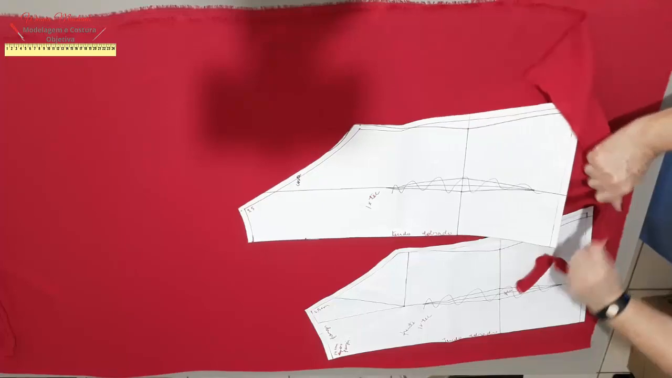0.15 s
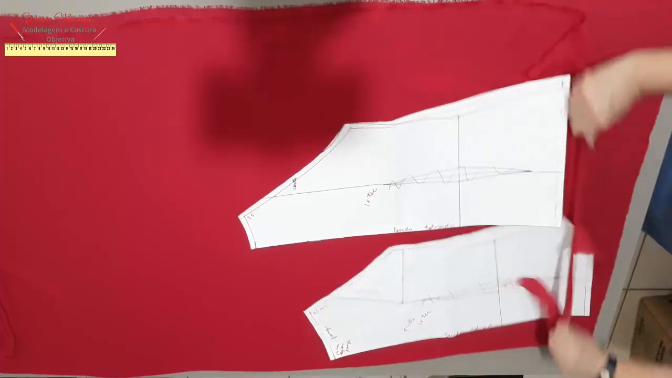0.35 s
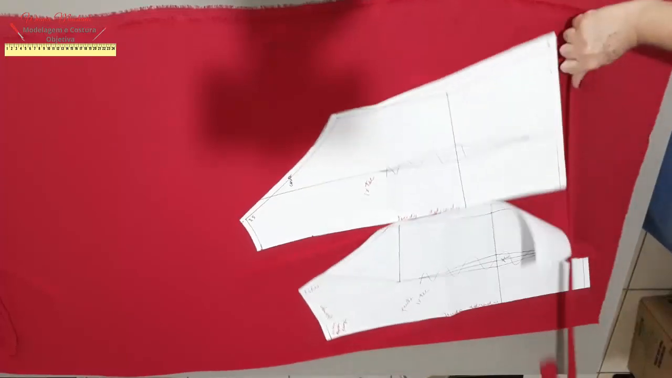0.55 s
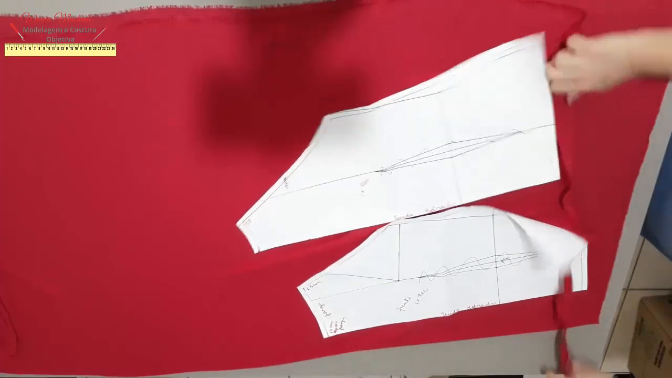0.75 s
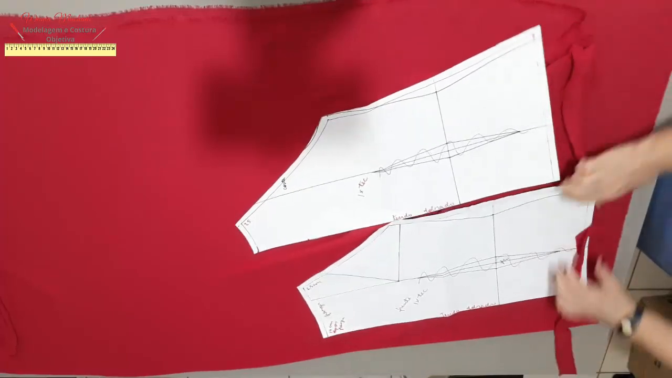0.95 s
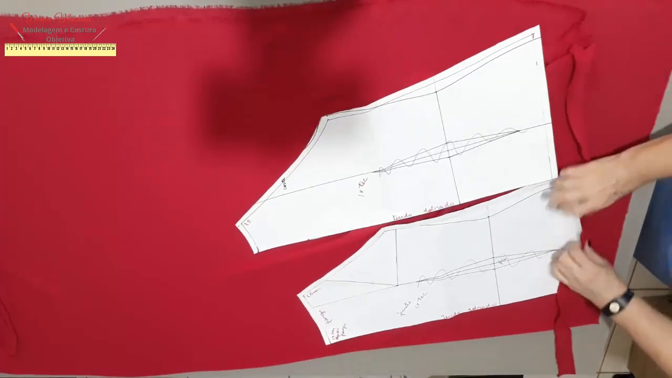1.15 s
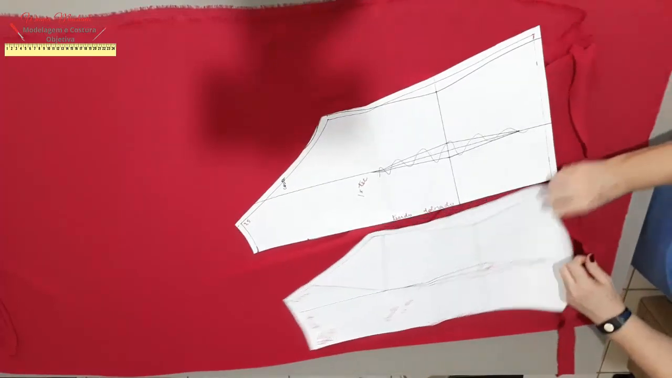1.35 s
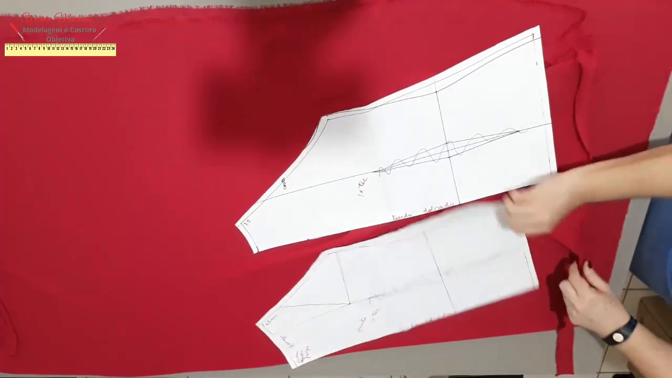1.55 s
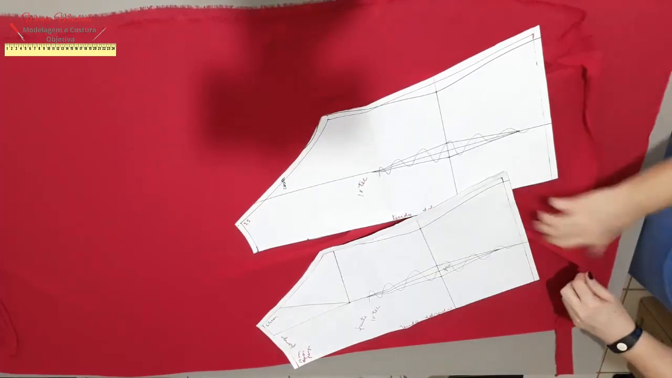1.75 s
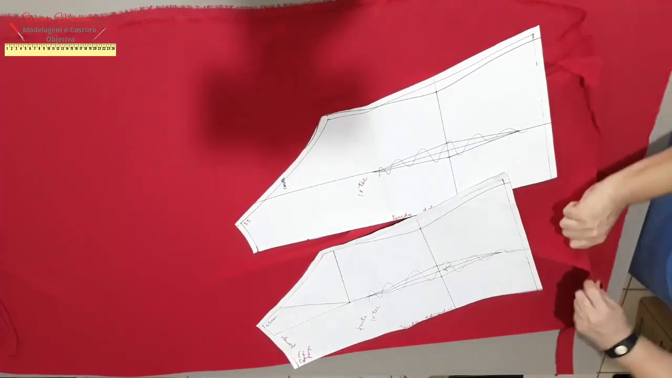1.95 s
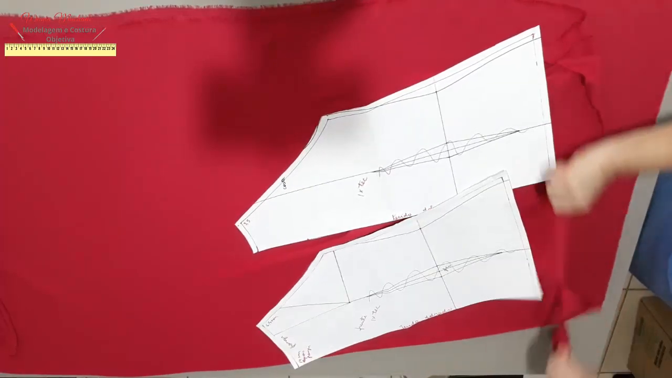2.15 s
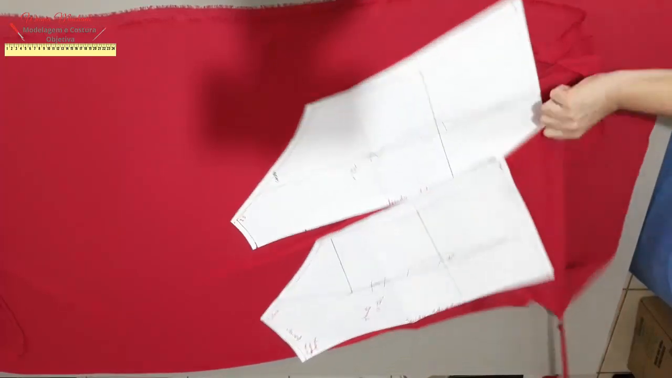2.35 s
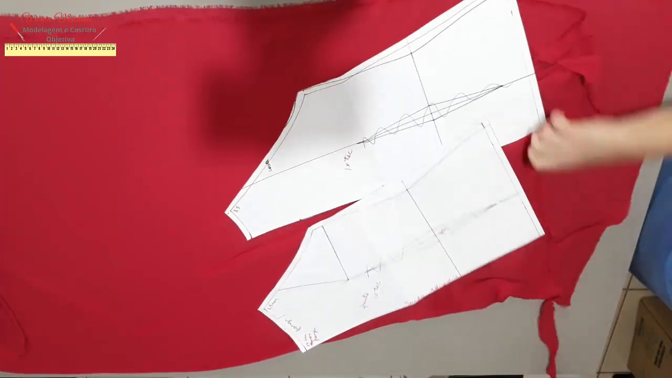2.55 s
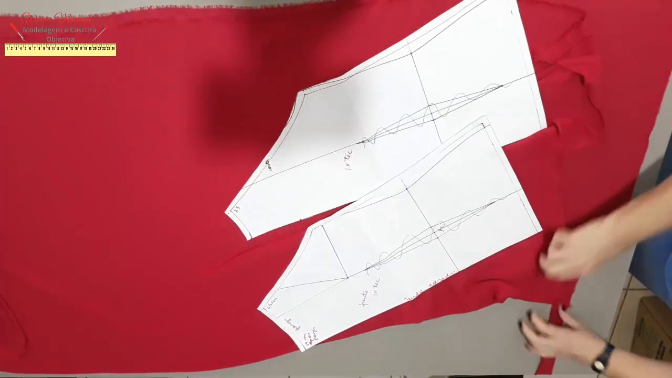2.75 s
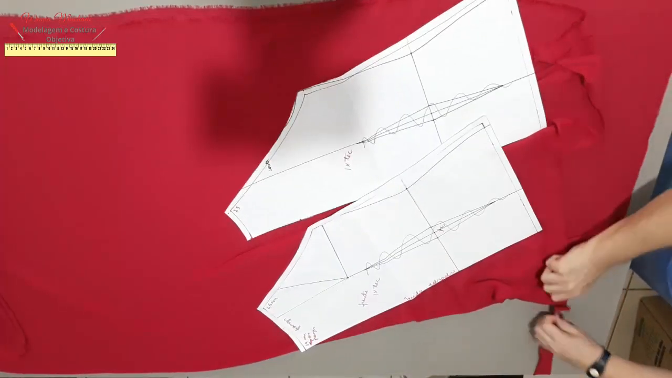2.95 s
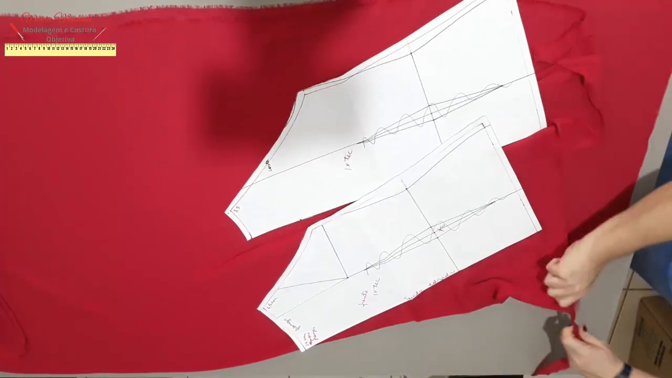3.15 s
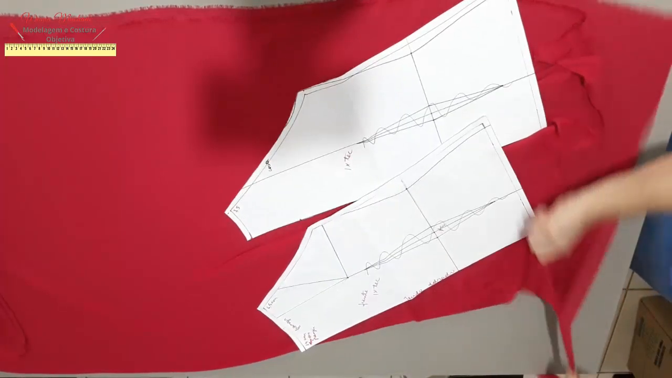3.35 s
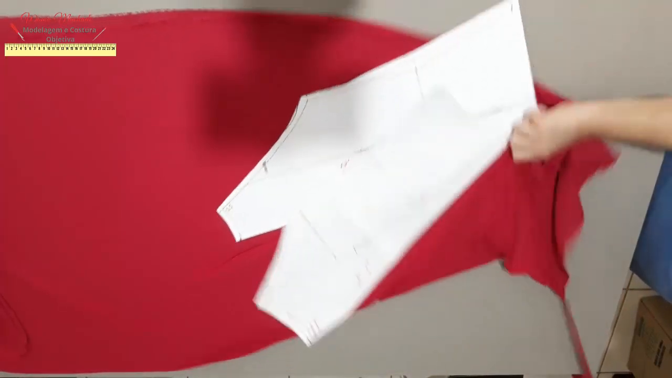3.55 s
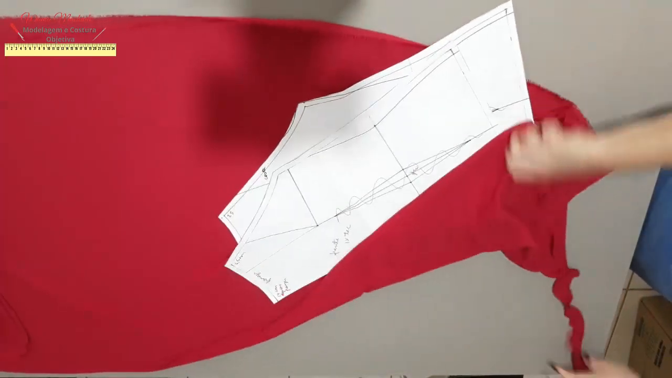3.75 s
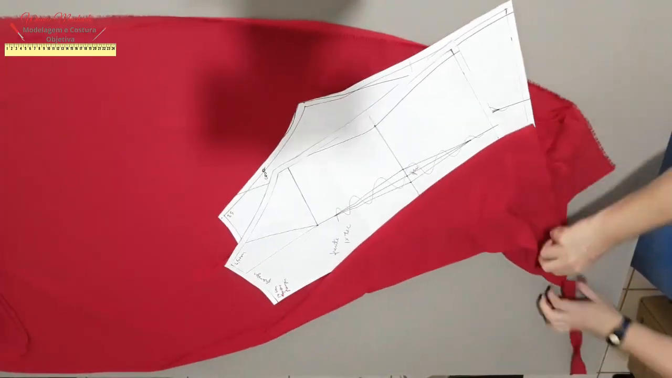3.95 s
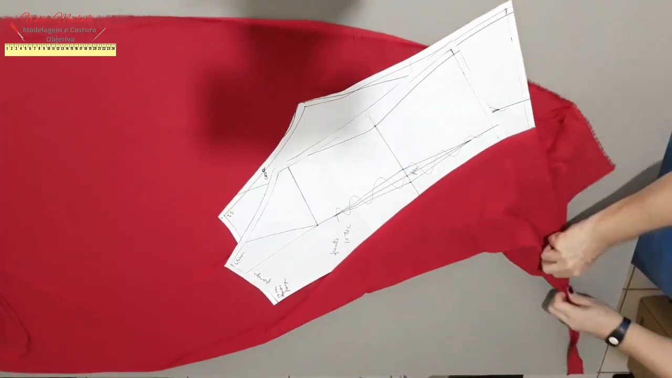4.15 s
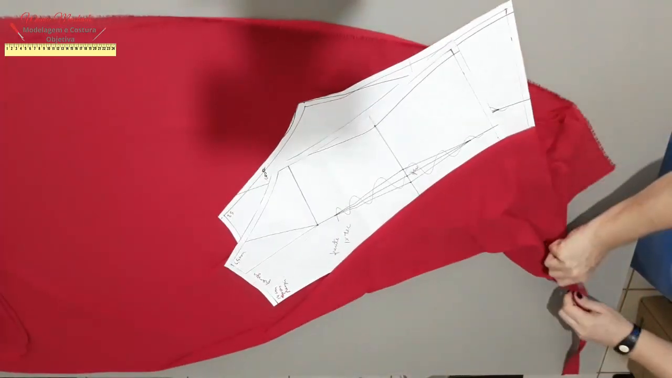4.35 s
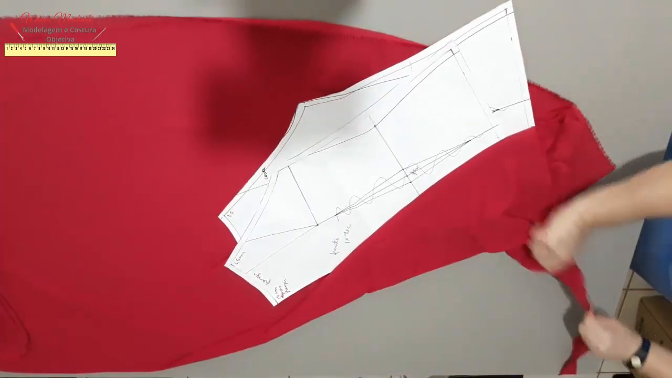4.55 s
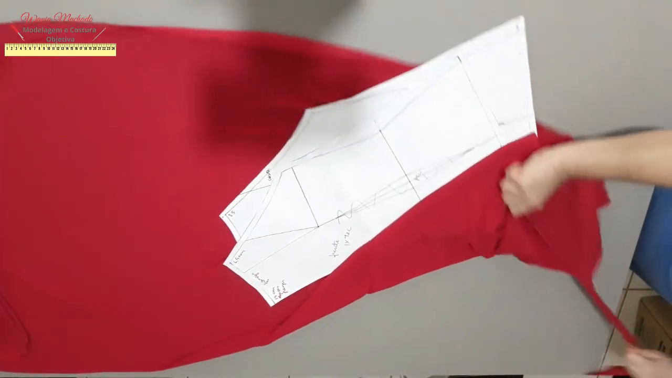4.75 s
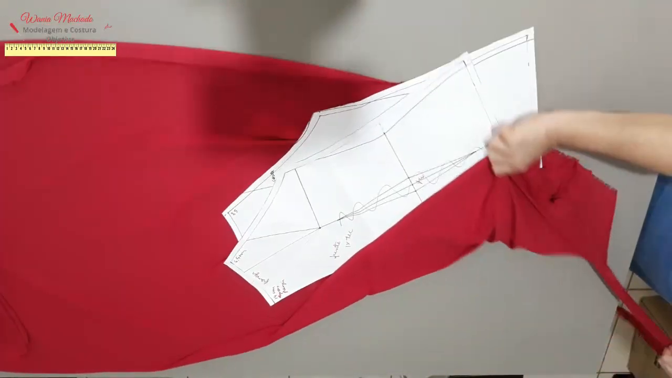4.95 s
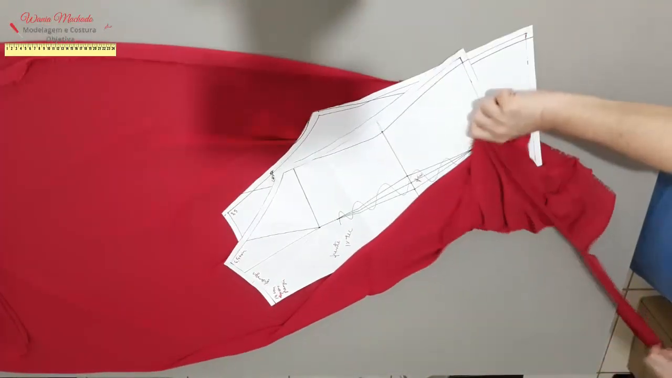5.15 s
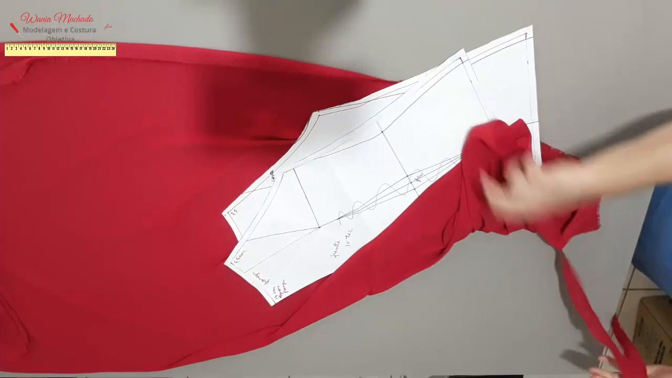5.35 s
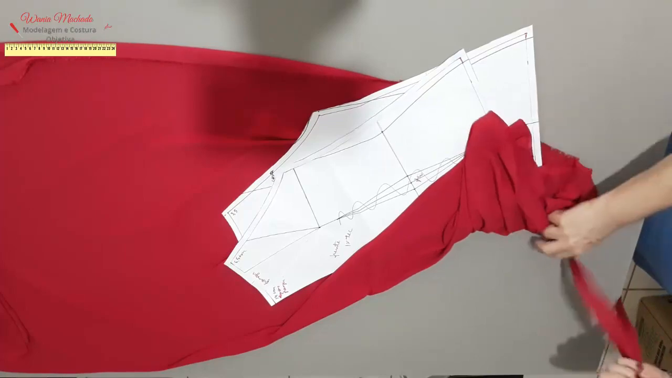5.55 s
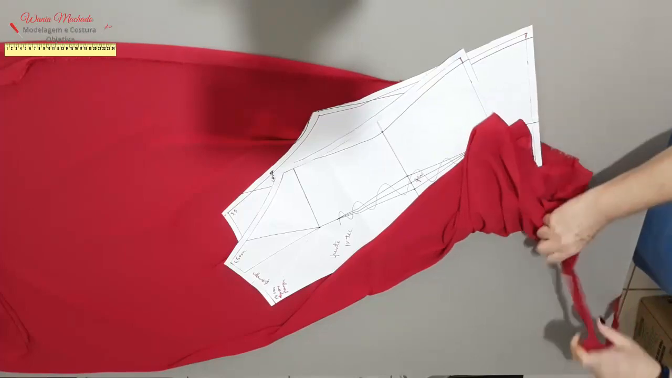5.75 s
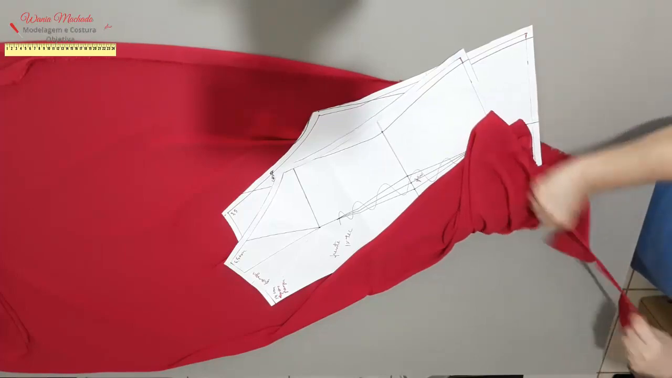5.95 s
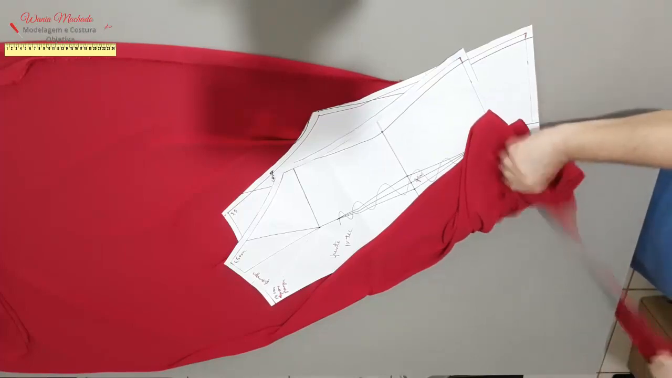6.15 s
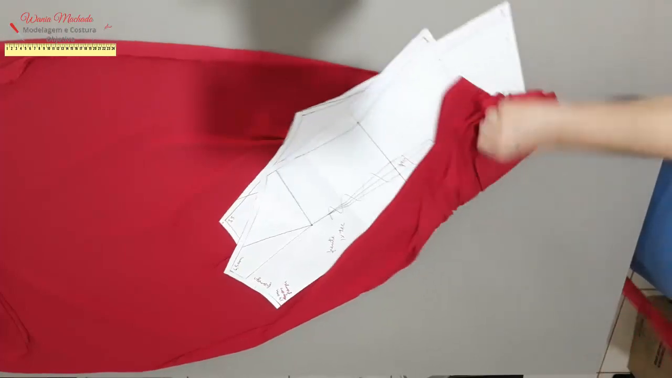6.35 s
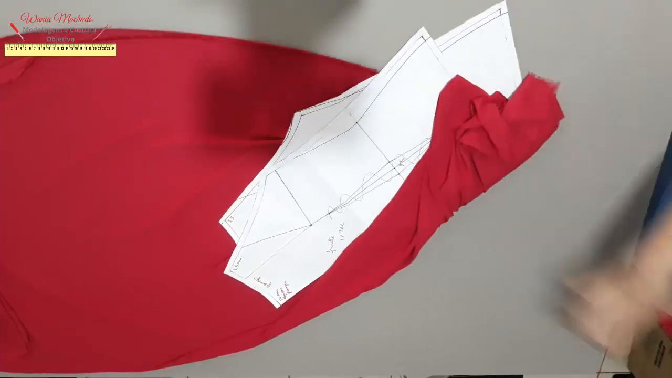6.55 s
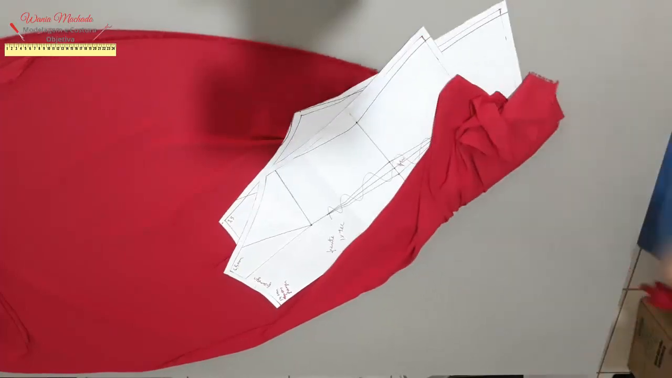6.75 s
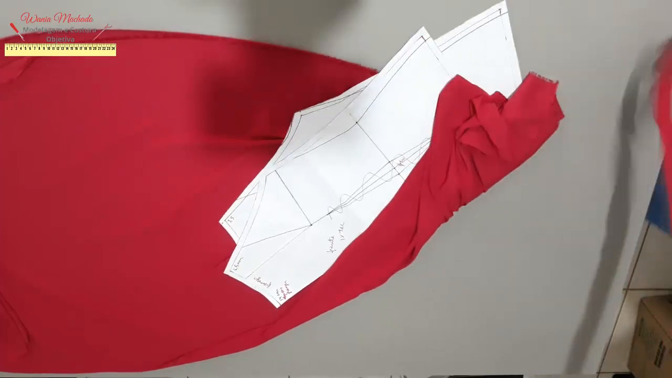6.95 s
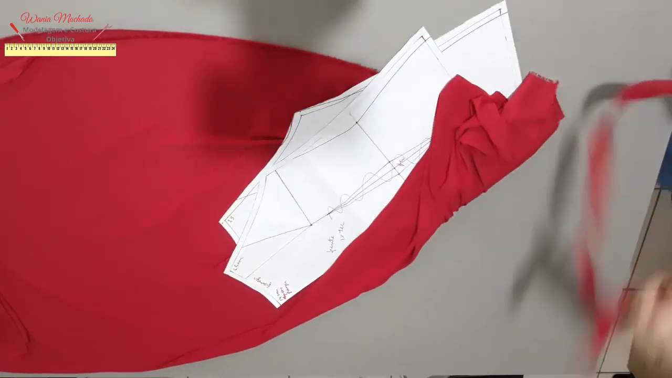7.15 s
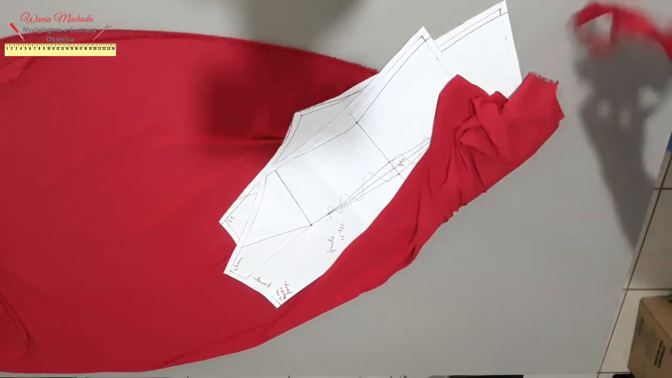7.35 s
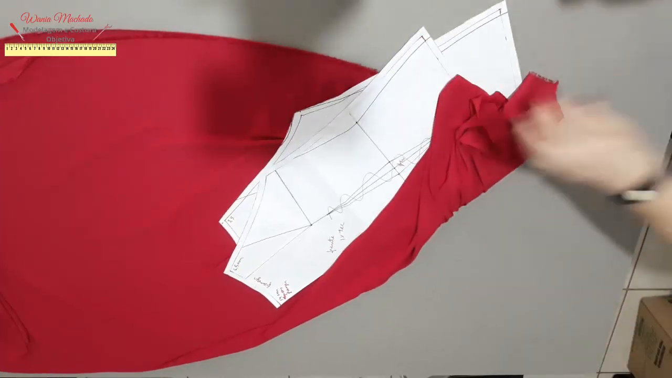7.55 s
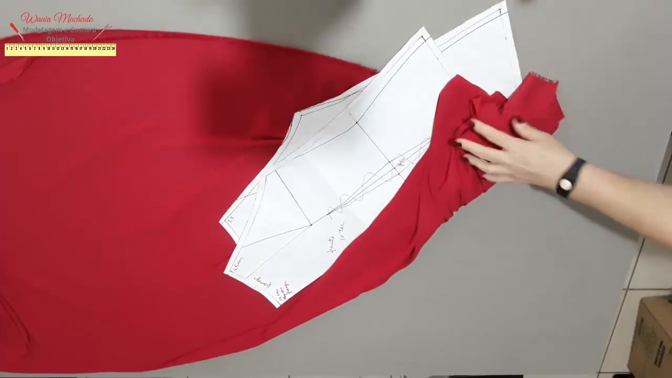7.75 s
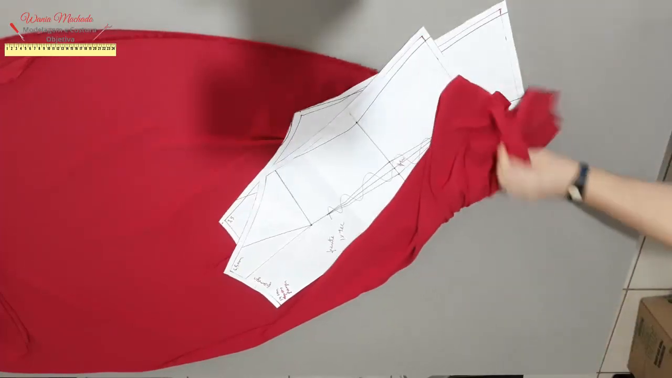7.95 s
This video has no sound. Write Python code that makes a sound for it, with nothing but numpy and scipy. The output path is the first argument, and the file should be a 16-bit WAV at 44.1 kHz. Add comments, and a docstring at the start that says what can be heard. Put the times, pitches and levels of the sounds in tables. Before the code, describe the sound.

Close on a table in a hard, reverberant room, thin cloth is ripped by hand in five bursts, each a dense crackle of snapping threads that drops in pitch and ends in coarser pops. Paper slides and crackles after the first rip, with soft table knocks. A faint steady hum and hiss lie behind, with a very faint bird far off. The microphone is nearby and almost mono.

```python
"""In a hard room, thin cloth is torn by hand on a table in five pulls, before a nearly mono microphone.
Threads snap in quick succession as noise bursts, shaped by a cloth resonance that drops as the tear grows.
Paper slides as friction grains and crackles as short pitched bursts; knocks ring the table's modes.
Behind the room's decaying ring lie a mains hum, patchy hiss and the buzzy sliding calls of a far bird."""
import sys
import numpy as np
from scipy import signal
from scipy.fft import rfft, irfft, next_fast_len
from scipy.io import wavfile
from scipy.ndimage import uniform_filter1d, map_coordinates

SR = 44100
rng = np.random.default_rng(int(sys.argv[2]) if len(sys.argv) > 2 else 0)


def log_audio(samples):
    """Write samples as a 16-bit WAV file to the path given in sys.argv[1]."""
    # one column per channel
    frames = np.atleast_2d(samples).T
    # limit to full scale, then quantise
    limited = np.clip(frames, -1, 1)
    pcm = np.round(limited * 32767).astype(np.int16)
    wavfile.write(sys.argv[1], SR, pcm)


N = 352359

# Pulls on the cloth: start_s, first_thread_db [relative], swell_s, end_s, full_level_db [relative],
# sag_db_per_s, stopping_db_per_s, opening_slack and final_slack [octaves below TAUT_HZ],
# slackening_s, cloth_resonance_db, strip_resonance_db
CLOTH_PULLS = [(0.2165, -17, 0.036, .64, -26.5, -17, 400, 1.68, 2.17, 0.13, 0.5, -1),
               (2.102, -17, 0.041, 2.422, -20, 4.5, 174, 1.43, 2.01, 0.17, -0.5, -1),
               (3.2804, -20, 0.028, 3.599, -26, -16.5, 205, 0.94, 2.38, 0.18, -2.5, -4),
               (4.5543, -29, 0.046, 5.22, -23, 7.5, 300, 1.04, 2.76, 0.24, 0, 5.5),
               (5.9868, -19, 0.022, 6.2, -21, 10, 400, 1.62, 1.66, 0.12, 3, 6.5)]
# Single loud threads as a pull slows: start_s, end_s, level_db [relative], threads_per_s [at first],
# fine_stream_lost_db [by the end]
THREAD_RUNS = [(.575, .665, -8, 125, 7), (2.29, 2.41, -10, 110, 3), (3.54, 3.62, -14, 110, 2),
               (4.9, 5.17, -6.5, 115, 11), (6.14, 6.215, -6, 150, 9)]
# Colour of a snapping thread: pitch_hz, level_db
THREAD_COLOUR = [(150, 12), (400, 7.5), (800, 2.5), (1800, -0.5), (3600, -1.5), (5500, -1), (6400, 1),
                 (8000, -2), (8800, 4), (9700, -0.5), (10700, 2), (15000, -4), (16000, 0.5)]
# Brighter crack of a loud thread: pitch_hz, level_db
LOUD_COLOUR = [(1000, -4), (5000, -4.5), (12000, 4.5), (16000, 5)]
# Low rumble under the snaps: pitch_hz, level_db
RUMBLE_COLOUR = [(20, -34.0), (100, -15.5), (200, -21.5), (400, -18.0), (900, -78)]
# Single crackles of paper and cloth: start_s, level_db [relative], pitch_hz, t60_s, sharpness [Q]
CRACKLE_EVENTS = [(0.266, -25.5, 2630, 0.095, 12), (0.296, -24, 2560, 0.073, 5.2),
                  (.816, -29, 2300, 0.076, 1), (0.861, -31.5, 2850, 0.12, 3),
                  (0.88, -19, 2310, 0.0094, 2.6), (.964, -15.5, 2170, 0.0076, 1.1),
                  (.987, -26.5, 6450, 0.015, 3), (1.197, -21.5, 7050, 0.022, 1.4),
                  (1.276, -31, 5140, 0.042, 1.2), (2.842, -21, 4550, 0.0095, 1.7),
                  (4.008, -29.5, 3700, 0.025, 0.92), (4.27, -34, 2180, 0.013, 1.85),
                  (6.95, -40.5, 880, 0.017, 2.2), (7.708, -51, 3120, .02, 4.6),
                  (7.735, -38.5, 903, 0.025, 1.1), (7.769, -42, 1300, 0.043, 1.5)]
# Knocks on the table and their rebounds: start_s, level_db [relative], contact_s
TABLE_KNOCKS = [(1.1129, -10, 0.0011), (1.14, -26, 0.00057), (1.158, -26, 0.00066), (1.199, -27, 0.00046),
                (1.22, -27, 0.001), (1.295, -29, 0.00065), (2.8413, -22.5, 0.00019), (2.864, -27, 0.0001),
                (2.904, -21.5, 0.00037), (2.925, -21, 0.00045), (2.949, -31.5, 0.00055),
                (2.984, -28, .0005), (3.061, -39, 0.00048), (4.0036, -21, 0.00025), (4.026, -22, 0.00025),
                (4.08, -28, 0.00014), (4.25, -35, 0.00023)]
# Modes of the table top: pitch_hz, width_hz, level_db
TABLE_MODES = [(132, 16, -8.5), (167, 45, -10), (207, 25, 1.5), (262, 22, -3), (313.4, 29, 2.5),
               (461, 34, -1), (541, 29, -2), (673, 30, -4), (763, 24, -3), (975, 29, -10), (1560, 19, 0.5),
               (1782, 20, 1.5)]
# Strokes of sliding paper and trailing cloth: start_s, rise_s, hold_s, level_db [relative],
# bright_edge_db and low_drag_db [both relative to level_db]
SLIDE_STROKES = [(0, 0.028, .06, -47.5, -1.5, -7), (0.788, 0.05, 0.043, -34, -6, -8.5),
                 (0.964, 0.031, 0.19, -44, -3, -7), (1.158, 0.045, .02, -35, 2, -6),
                 (1.27, .01, .01, -30, -0.5, -10.5), (1.308, 0.086, 0.29, -37.5, 1.5, -10.5),
                 (1.41, 0.045, 0.048, -39.5, 7.5, -10), (1.925, .03, 0.11, -52, -3.5, -12),
                 (2.847, 0.0087, 0.0088, -34, -16, -1), (3.69, 0.038, 0.0079, -36.5, 0.5, -26),
                 (4.003, .02, 0.015, -35, -12.5, 1.5), (4.264, 0.0034, 0.011, -45, -20, -4),
                 (5.4, 0.13, 0.14, -61, -25, -1), (6.228, 0.019, 0.13, -39.5, 4, -6),
                 (6.74, 0.17, 0.066, -55, 3, 2), (7.357, 0.17, 0.074, -55, -4.5, 3.5),
                 (7.669, 0.017, .03, -54, -1.5, 4), (7.737, 0.011, 0.047, -53, -16, 6),
                 (7.88, .05, .1, -59.5, 8.5, 1)]
# Colour of rubbed paper: pitch_hz, level_db [per Hz]
PAPER_COLOUR = [(530, -18), (900, 2.5), (1160, 3.5), (1270, 5), (1910, 5.5), (3010, 9.5), (4180, 6),
                (6230, -2), (7500, -20), (9750, -53), (16500, -120)]
# Colour of a stroke's bright edge: pitch_hz, level_db [per Hz]
EDGE_COLOUR = [(3240, -12), (5500, -0.5), (6970, 2.5), (7830, -2), (8790, 4.5), (9530, 0), (15000, -7.5),
               (16000, -15)]
# Colour of a stroke's low drag: pitch_hz, level_db [per Hz]
DRAG_COLOUR = [(200, 3), (350, 14), (600, 9.5), (1100, 2.5), (1800, -17)]
# Colour of the faint low rumble that comes with the rubbing: pitch_hz, level_db [per Hz]
LEGS_COLOUR = [(35, -25), (50, -14), (62, 17), (85, -18), (150, -70)]
# Decay of the room: pitch_hz, t60_s
ROOM_DECAY = [(150, 0.95), (500, 0.63), (2000, 0.6), (6000, 0.5), (14000, 0.28)]
# Calls of the far bird: start_s, length_s, level_db [at the opening], pitch_hz [at the opening],
# fall_hz [by the end], blur [0 to 1, at the opening]
BIRD_CALLS = [(3.145, 0.23, -61.5, 4920, 100, .6), (3.852, 0.19, -57, 5900, 200, 0.3),
              (4.445, 0.24, -52.5, 5760, 101, 0.4), (5.42, 0.2, -60, 4500, 203, 0.8),
              (5.62, .32, -54.5, 5840, 250.2, 0.4), (6.8, 0.18, -56, 5785, 200, .5),
              (6.92, 0.27, -55.5, 5000, 503, .9), (7.3, .24, -55.5, 5870, 199, 0.3),
              (7.458, .22, -54.5, 5010, 700, .9), (7.8, 0.27, -56, 5800, 300, .5)]
# Spread of a call around its pitch, narrow and wide: offset_hz, level_db
NARROW_SPREAD = [(150, 0), (300, -4), (600, -23), (1500, -70)]
WIDE_SPREAD = [(300, 0), (700, -5), (1400, -20), (2500, -70)]
# Level of the hum over time: time_s, level_db [rms]
HUM_LEVEL = [(0, -50.5), (.4, -46.5), (1.5, -48), (1.95, -49), (2.5, -47.5), (2.95, -50), (3.7, -47),
             (4.36, -50), (5.07, -46), (5.35, -50), (7.99, -50)]
# Colour of the hiss: pitch_hz, level_db [per Hz]
HISS_COLOUR = [(12, -65.5), (20, -28), (55, -19), (123, -11), (146, -12), (255, -15), (357, -11.5),
               (399, -15), (472, -14), (513, -17.5), (1610, -22), (2200, -23.5), (4940, -27), (14700, -35),
               (16000, -48)]
# Share of the hiss that differs between the channels: pitch_hz, level_db
HISS_SIDE_COLOUR = [(60, -31), (200, -19), (700, -11), (2400, -7.5), (5000, -10.5), (15000, -6)]

TAUT_HZ = 3000  # pitch of the cloth without slack
STRIP_HZ = 1630  # the narrow strip held tight in the hand
STRIP_FADE_S = 0.38  # the strip loosens as it grows
OPENING_DB = 11.5  # a pull starts this far under its full level
BIG_DB, BIG_GROWS_DB = -11.5, 2.5  # big snaps against fine ones at the start, their gain by the end
RUN_SLOWS, RUN_SCATTER = .03, .3  # widening of the gaps per thread, random share of a gap
RUN_FADE_DB, RUN_SPREAD_DB = 4, 2  # loss by the end of a run, random spread
SHUDDER_T60_S = 0.044
SLIDE_RISE_DB, SLIDE_FADE_DB_PER_S = 9.5, 94
CALL_RISE_S, CALL_FALL_S = .04, 0.054
CALL_SAG_DB, BLUR_GROWS = 3.5, 0.34  # loss of level and gain of blur over a call
FALL_BEND = 1.3  # the pitch holds at first and drops late
HUM_HZ = 120
TOP_HZ = 15850  # band limit of the input stage


def tearing():
    """Threads snap one after another; as the tear runs on, the loose cloth grows and its pitch falls."""
    level_db, slack, boost_db, big_db, strip_db = pulled()
    stream = grains(3000, .0005, 3) + amp(big_db) * grains(300, .0006, 2)
    # the pull advances in small lurches
    lurch_db = .6 * wobble(50)
    size, thin_db = loud_threads()
    loud = shaped(bursts(size, .0009), LOUD_COLOUR)
    snaps = amp(level_db - thin_db + lurch_db) * stream + loud
    rumble = shaped(snaps, RUMBLE_COLOUR)
    pitch_hz = TAUT_HZ / 2 ** slack
    return cloth(shaped(snaps, THREAD_COLOUR), pitch_hz, boost_db, strip_db) + rumble


def pulled():
    """A pull opens at once, swells, sags or grows, and stops; slack and big snaps grow, the strip fades."""
    columns = np.transpose(CLOTH_PULLS)[..., None]
    start, _, swell, end, full_db, sag, stop, slack_from, slack_to, slackens, boost_db, strip_db = columns
    age = np.arange(N) / SR - start
    since = np.clip(age, 0, None)
    done = np.clip(age / (end - start), 0, 1)
    level_db = full_db - OPENING_DB * np.exp(-since / swell) - sag * since
    level_db -= stop * np.clip(age + start - end, 0, None)
    level_db = np.where(age < 0, -200, np.maximum(level_db, -150))
    slack = slack_to + (slack_from - slack_to) * np.exp(-since / slackens)
    big_db = BIG_DB + BIG_GROWS_DB * done
    return loudest(level_db, slack, boost_db + 0 * age, big_db, strip_db * np.exp(-since / STRIP_FADE_S))


def loud_threads():
    """Each pull's first thread, then runs of loud ones at widening gaps while the fine stream thins."""
    size, thin_db, t = np.zeros(N), np.zeros(N), np.arange(N) / SR
    for start, db, *_ in CLOTH_PULLS:
        size[round(start * SR)] = amp(db - 6)
    for start, end, db, rate, lost_db in THREAD_RUNS:
        shift, spread = rng.uniform(-1, 1, (2, 40))
        k = np.arange(len(shift)) + .5 + RUN_SCATTER * shift
        snap_s = start + k * (1 + RUN_SLOWS * k) / rate
        done = (snap_s - start) / (end - start)
        snap_db = db - 5.5 - RUN_FADE_DB * done ** 2 + RUN_SPREAD_DB * spread
        inside = snap_s < end
        size[(snap_s[inside] * SR).astype(int)] = amp(snap_db[inside])
        # the stream stays thin for half a second after the run
        thin_db += lost_db * np.clip((t - start) / (end - start), 0, 1) * (t < end + .5)
    return size, thin_db


def cloth(x, pitch_hz, boost_db, strip_db):
    """Cloth by the tear radiates little below its pitch and its resonance follows it; the strip has its own."""
    hz, t, z = signal.stft(x, SR, nperseg=256)
    at = np.minimum((t * SR).astype(int), N - 1)
    octaves = np.log2((hz[:, None] + 1) / pitch_hz[at])
    strip_octaves = np.log2((hz[:, None] + 1) / STRIP_HZ)
    gain_db = boost_db[at] * np.exp(-(octaves / .5) ** 2)
    gain_db += 16 * np.clip(octaves + 0.21, -2.2, 0)
    gain_db += strip_db[at] * np.exp(-(strip_octaves / 0.35) ** 2)
    return signal.istft(z * amp(gain_db), SR, nperseg=256)[1][:N]


def crackles():
    """Each crackle is a short noise burst around its own pitch; sharp ones squeak."""
    out, t = np.zeros(N + SR), np.arange(SR // 8) / SR
    for s, db, hz, t60, sharpness in CRACKLE_EVENTS:
        resonance = signal.iirpeak(hz, max(sharpness, .7), SR)
        burst = unit(signal.lfilter(*resonance, rng.standard_normal(len(t))))
        onset = 1 - np.exp(-t / 0.0012)
        out[round(s * SR):][:len(t)] += amp(db - 60 * t / t60) * burst * onset
    return out[:N]


def knocks():
    """A push and a dying shudder excite the table top; a soft contact leaves the high modes quiet."""
    force, t = np.zeros(N + SR), np.arange(SR // 2) / SR
    for s, db, contact in TABLE_KNOCKS:
        blow = 3 * rng.standard_normal(len(t)) * amp(-60 * t / SHUDDER_T60_S)
        blow[0] = 90  # the push
        keep = np.exp(-1 / (contact * SR))
        softened = signal.lfilter([(1 - keep) ** 2], [1, -2 * keep, keep ** 2], blow)
        force[round(s * SR):][:len(t)] += amp(db + 2) * softened
    return ringing(force[:N], TABLE_MODES)


def sliding():
    """Fine friction grains of paper and cloth; the rubbing has a faint low rumble, as of shaken table legs."""
    body, edge, drag = stroked()
    rub = grains(4000, .002, 1.5)
    paper = body * coloured(rub, PAPER_COLOUR)
    bright = edge * coloured(rub, EDGE_COLOUR)
    low = drag * coloured(rng.standard_normal(N), DRAG_COLOUR)
    legs = body * amp(-27) * coloured(rng.standard_normal(N), LEGS_COLOUR)
    return amp(-5 + 0.17 * wobble(33)) * (paper + bright + low + legs)


def stroked():
    """Gains of rub, edge and drag: each stroke rises, holds and fades; strokes add in power."""
    start, rise, hold, db, edge_db, drag_db = np.transpose(SLIDE_STROKES)[..., None]
    age = np.arange(0, N, 32) / SR - start  # one gain per 32 samples
    level_db = db - SLIDE_RISE_DB * np.clip(1 - age / rise, 0, 8)
    level_db -= SLIDE_FADE_DB_PER_S * np.clip(age - rise - hold, 0, None)
    gains = [np.linalg.norm(amp(level_db + part_db), axis=0) for part_db in (0, edge_db, drag_db)]
    return [np.repeat(gain, 32)[:N] for gain in gains]


def room(x, count=3):
    """Each frequency of the ring dies at its own speed; the sound wanders slowly between a few noise tails."""
    hz, t, z = signal.stft(rng.standard_normal((count, SR * 3 // 4)), SR, nperseg=256)
    decay = amp(-60 * t / along(ROOM_DECAY, hz)[:, None])
    tails = signal.istft(z * decay, SR, nperseg=256)[1]
    # share of the sound sent to each tail
    turn = 3.2 * np.arange(N) / SR + np.arange(count)[:, None] / count
    share = np.cos(np.pi * turn) ** 2 * 2 / count
    delayed = np.pad(x * np.sqrt(share), ((0, 0), (260, 0)))
    wet = signal.fftconvolve(delayed, tails / np.linalg.norm(tails[0]), axes=1)
    return wet.sum(axis=0)[:N]


def bird():
    """Far buzzy calls, blurred to a hiss around a sliding pitch."""
    db, hz, blur = called()
    narrow = coloured(rng.standard_normal(N), NARROW_SPREAD)
    wide = coloured(rng.standard_normal(N), WIDE_SPREAD)
    turn = np.pi / 2 * np.clip(blur, 0, 1)
    buzz = np.cos(turn) * narrow + np.sin(turn) * wide
    return amp(db) * buzz * np.cos(2 * np.pi * np.cumsum(hz) / SR)


def called():
    """Each call swells in, slides down in pitch, blurs and dies away."""
    start, length, db, hz, fall, blur = np.transpose(BIRD_CALLS)[..., None]
    age = np.arange(N) / SR - start
    done = np.clip(age / length, 0, 1)
    edge = np.minimum(age / CALL_RISE_S, (length - age) / CALL_FALL_S)
    level_db = db - CALL_SAG_DB * done + 12 * np.clip(edge - 1, -8, 0)
    return loudest(level_db, hz - fall * done ** FALL_BEND, blur + BLUR_GROWS * done)


def mains_hum():
    """A single low sine whose level and phase drift a little."""
    t = np.arange(N) / SR
    s, db = np.transpose(HUM_LEVEL)
    level_db = np.interp(t, s, db) + .8 * wobble(14)
    return amp(level_db + 3) * np.sin(2 * np.pi * HUM_HZ * t + .2 * wobble(8))  # 3 dB: rms to peak


def hiss():
    """A steady, slightly patchy coloured noise that differs a little between the channels."""
    mid = amp(-57 + .7 * wobble(4)) * coloured(rng.standard_normal(N), HISS_COLOUR)
    side = shaped(amp(-57) * coloured(rng.standard_normal(N), HISS_COLOUR), HISS_SIDE_COLOUR)
    return mid + np.array([side, -side])


def grains(per_second, life, spread_db):
    """Bursts at random moments with scattered sizes; their mean power stays even."""
    scatter_db = spread_db * np.clip(rng.standard_normal(N), -2, 2)
    x = bursts((rng.random(N) < per_second / SR) * amp(scatter_db), life)
    power = uniform_filter1d(uniform_filter1d(x ** 2, size=SR // 30), size=SR // 30)
    return x / np.sqrt(np.abs(power) + 1e-4)


def bursts(size, life):
    """Noise that starts at each non-zero size and decays with a time constant of life seconds."""
    noise = np.clip(rng.standard_normal(N), -1.8, 1.8)
    return signal.lfilter([1], [1, -np.exp(-1 / (life * SR))], size) * noise


def loudest(levels_db, *cols):
    """At each moment the highest of the events' levels, and the other controls of that same event."""
    pick = np.argmax(levels_db, axis=0)[None]
    return [np.take_along_axis(np.asarray(c), pick, axis=0)[0] for c in (levels_db, *cols)]


def ringing(x, modes):
    """x through resonances of alternating sign."""
    def response(f):
        total = 0
        for k, (centre, width, db) in enumerate(modes):
            damping = 1j * f * width
            total = total + (-1) ** k * amp(db) * damping / (centre * centre - f * f + damping)
        return total
    return filtered(x, response)


def coloured(x, spectrum):
    """x in the colour of (Hz, dB) points, rms 1."""
    return unit(shaped(x, spectrum))


def shaped(x, spectrum):
    """x with the gains of (Hz, dB) points."""
    return filtered(x, lambda hz: amp(along(spectrum, hz)))


def filtered(x, response):
    """x times a response of frequency."""
    m = next_fast_len(N + SR // 2)
    return irfft(rfft(x, m) * response(np.fft.rfftfreq(m, 1 / SR)), m)[..., :N]


def wobble(rate):
    """A smooth random curve, rate knots a second."""
    return map_coordinates(rng.standard_normal(int(N * rate / SR) + 4), [np.arange(N) * rate / SR])


def along(points, hz):
    """(Hz, value) points on a log axis."""
    f, v = np.transpose(points)
    return np.interp(np.log(hz + 1), np.log(f + 1), v)


def unit(x):
    """x at rms 1."""
    return x / np.sqrt(np.mean(x ** 2) + 1e-20)


def amp(db):
    """Decibels to amplitude."""
    return 10 ** (np.asarray(db) / 20)


def scene():
    """Tearing, crackles and knocks ring in the room; slides, bird, hum and hiss are added without it."""
    pulls, thuds = tearing() + crackles(), knocks()
    ring = room(amp(-0.5) * pulls + amp(-1.5) * thuds)
    return pulls + thuds + ring + sliding() + bird() + mains_hum() + hiss()


def record(dry):
    """The input stage rounds off the highest peaks, keeps nothing above its band limit and has a small offset."""
    rounded = dry / (1 + np.abs(dry / .5) ** 4) ** (1 / 4)
    return filtered(rounded, lambda hz: np.clip((TOP_HZ - hz) / 150, 0, 1)) - .0018


dry = scene()
out = record(dry)
log_audio(out)
```